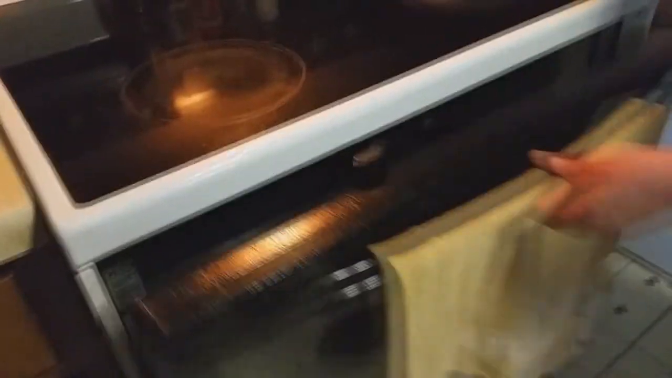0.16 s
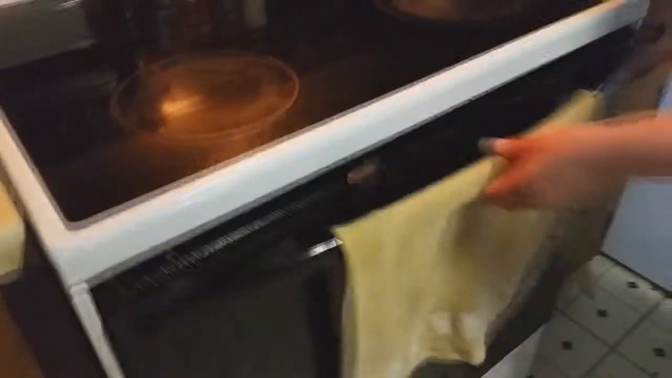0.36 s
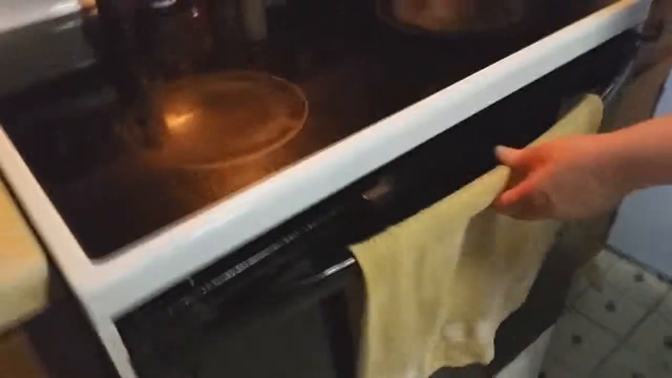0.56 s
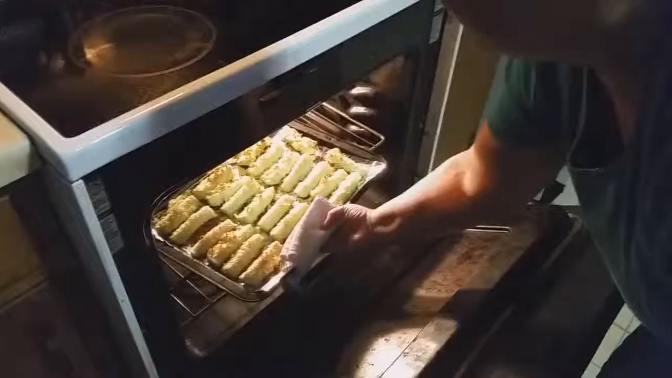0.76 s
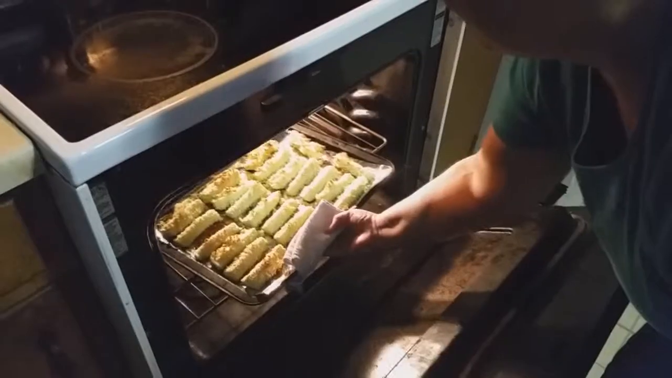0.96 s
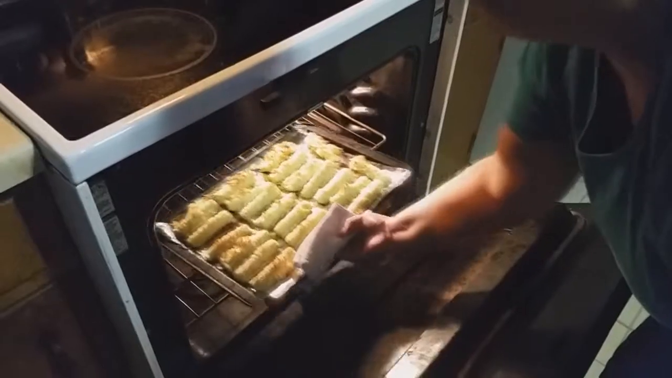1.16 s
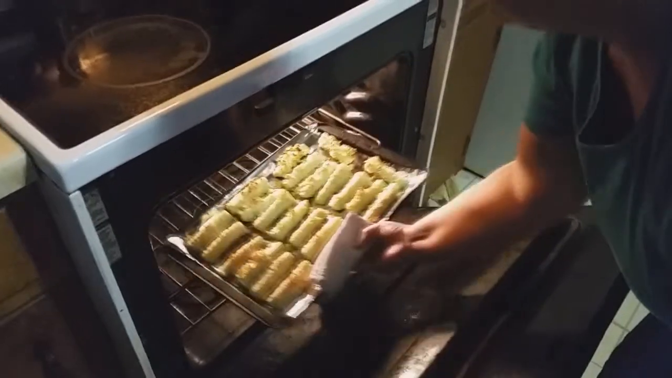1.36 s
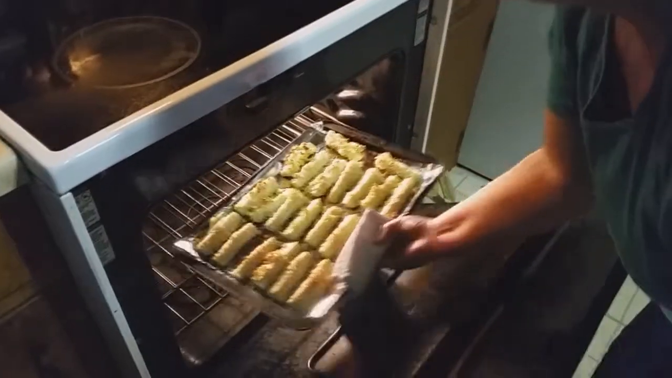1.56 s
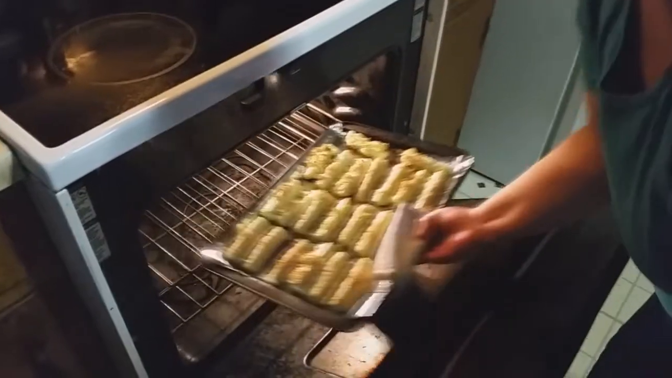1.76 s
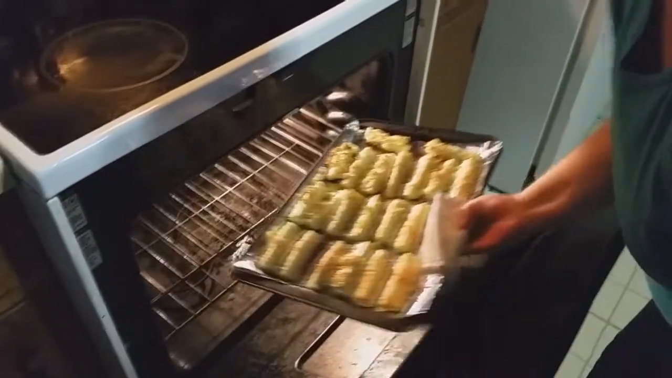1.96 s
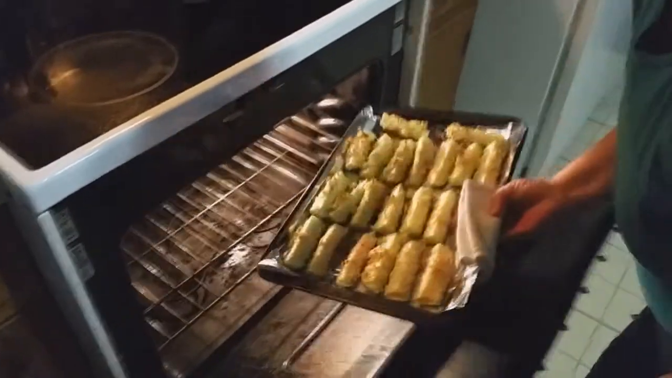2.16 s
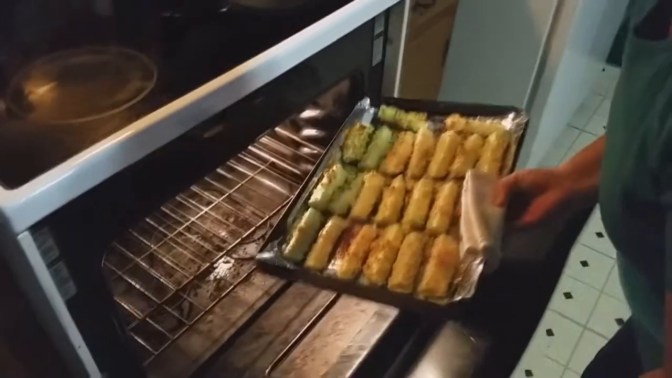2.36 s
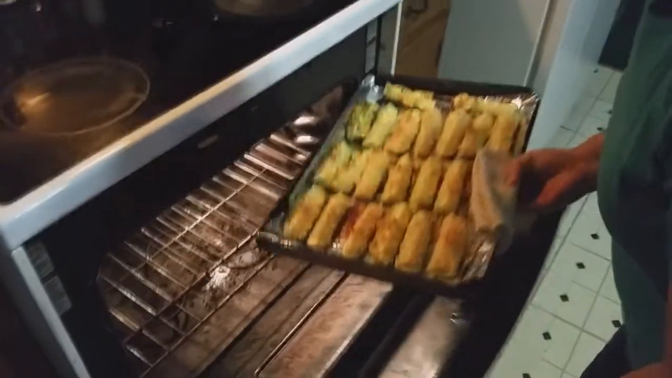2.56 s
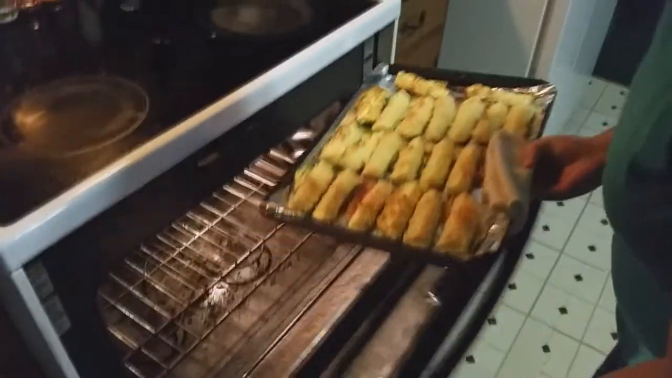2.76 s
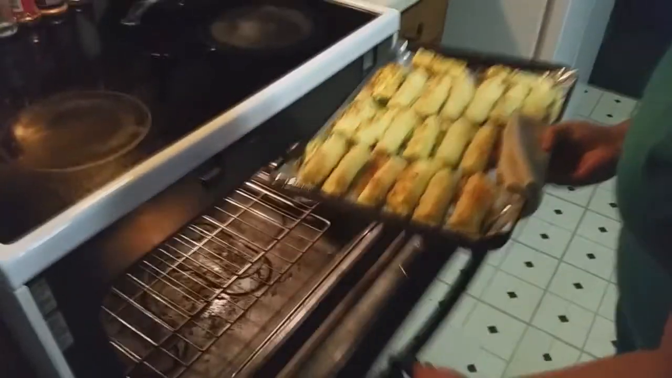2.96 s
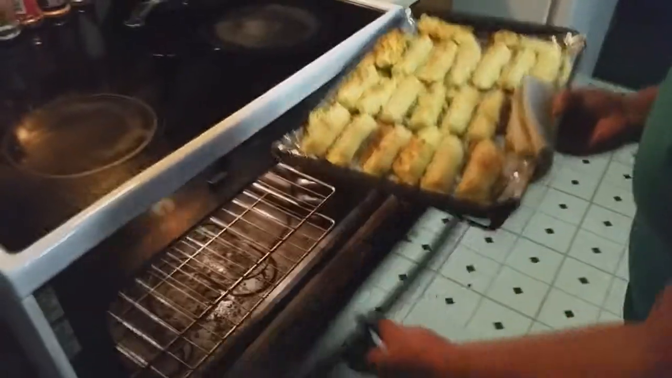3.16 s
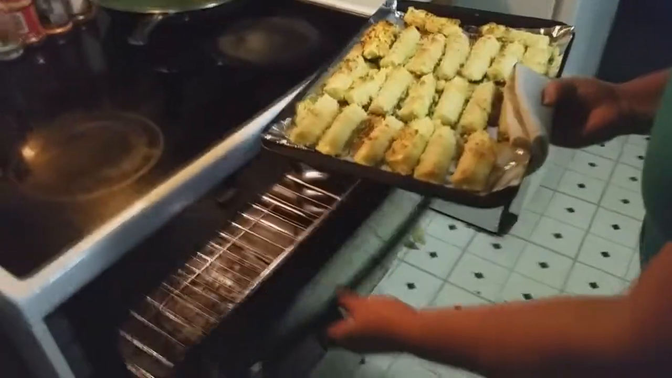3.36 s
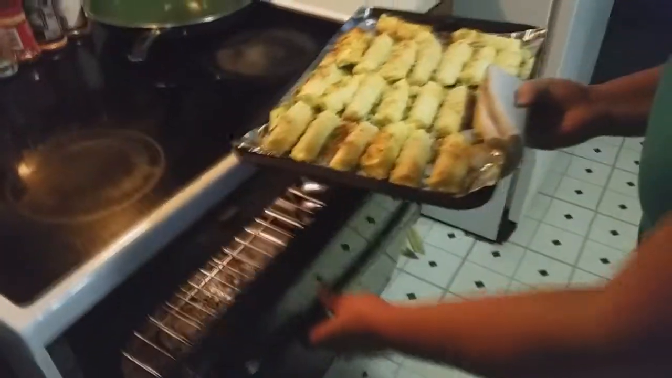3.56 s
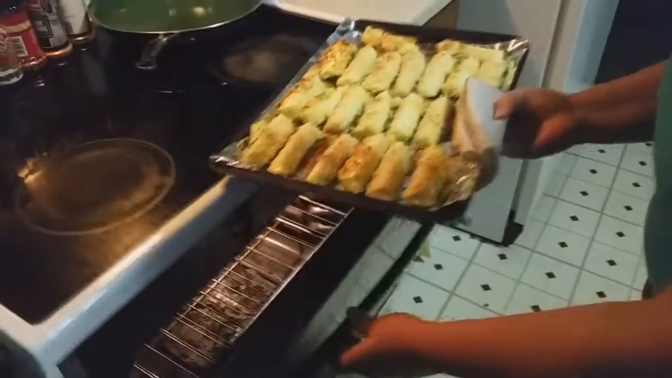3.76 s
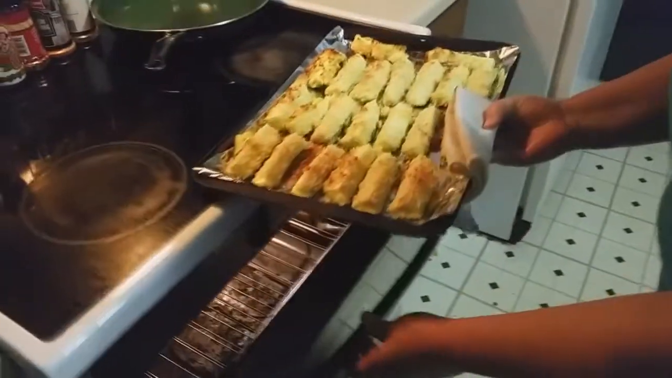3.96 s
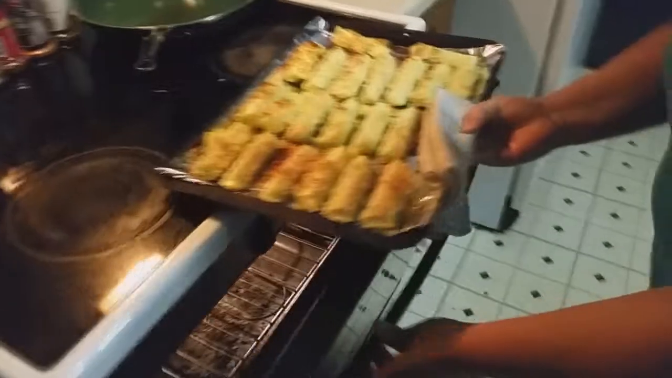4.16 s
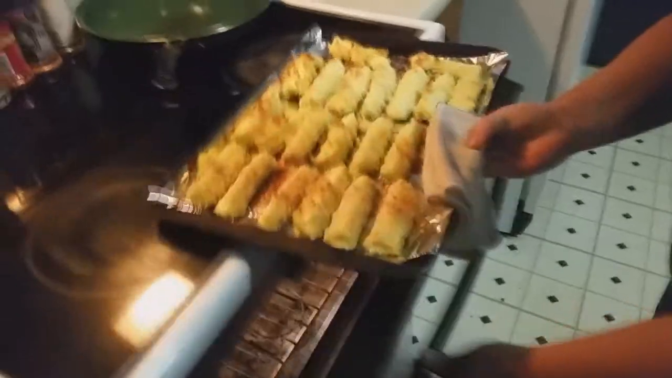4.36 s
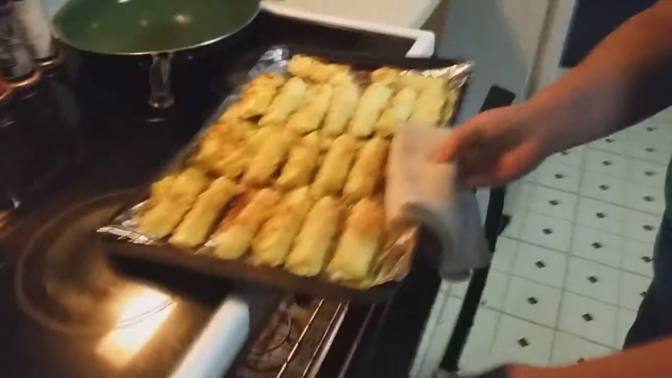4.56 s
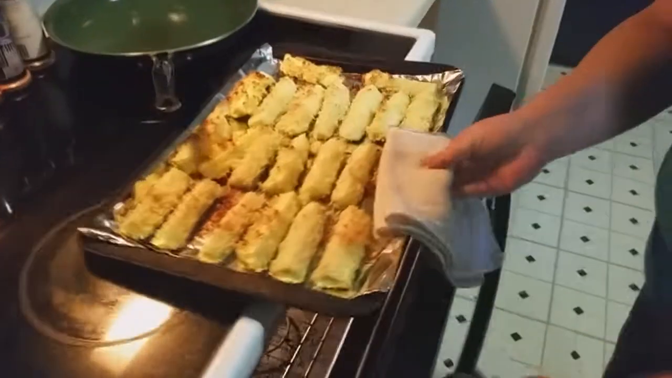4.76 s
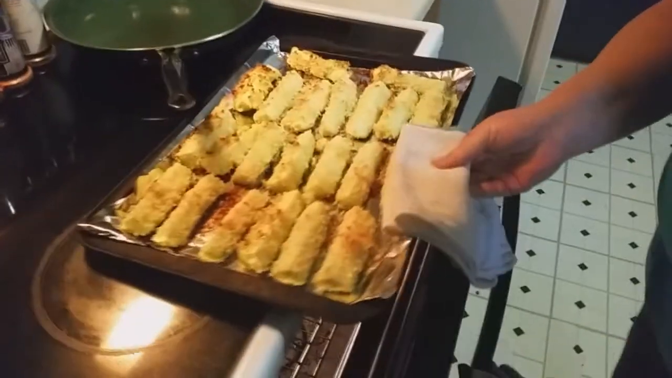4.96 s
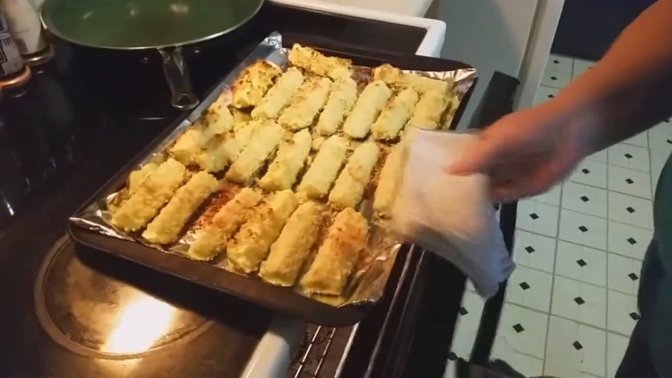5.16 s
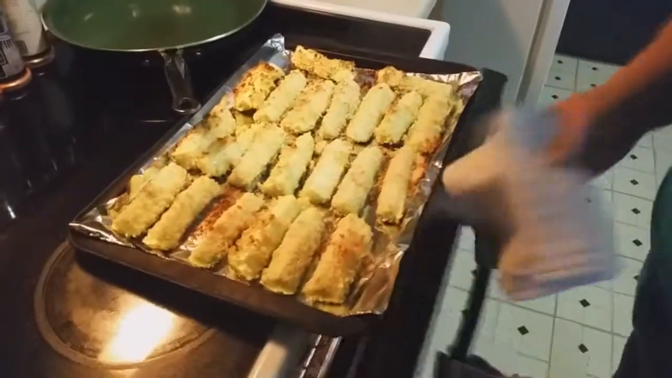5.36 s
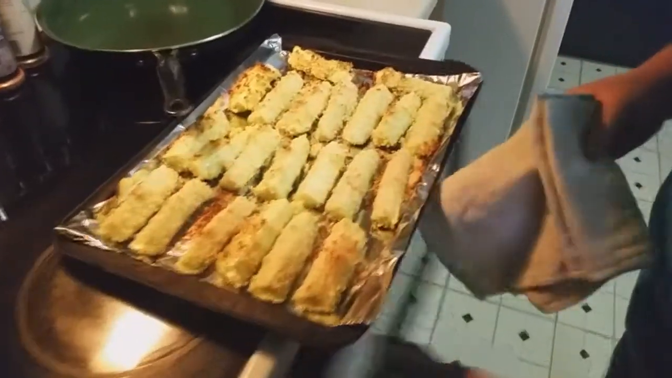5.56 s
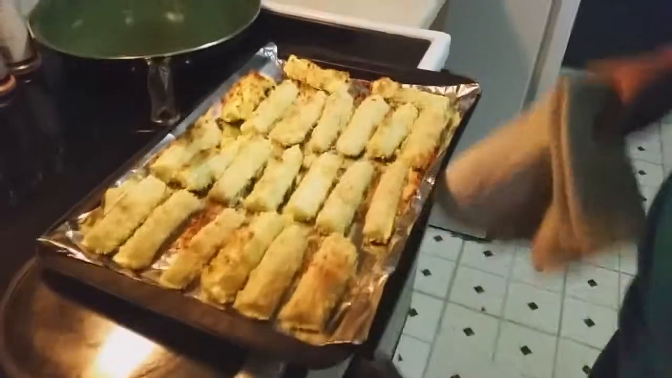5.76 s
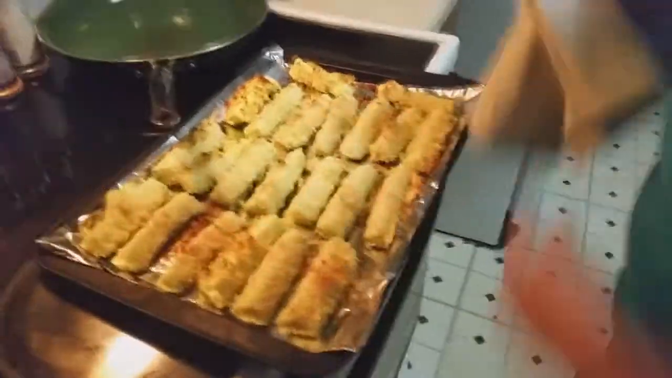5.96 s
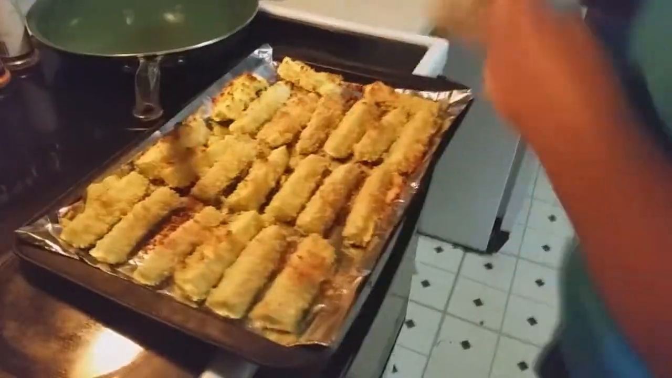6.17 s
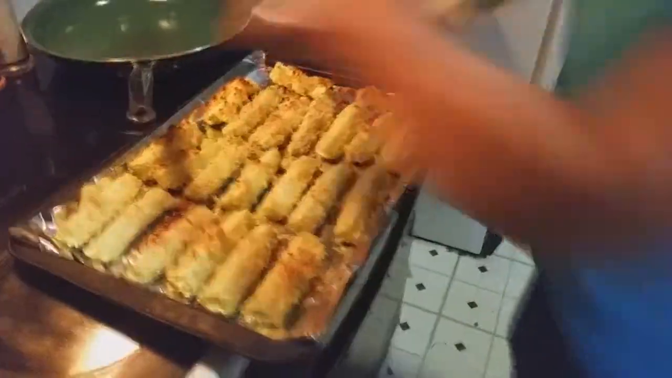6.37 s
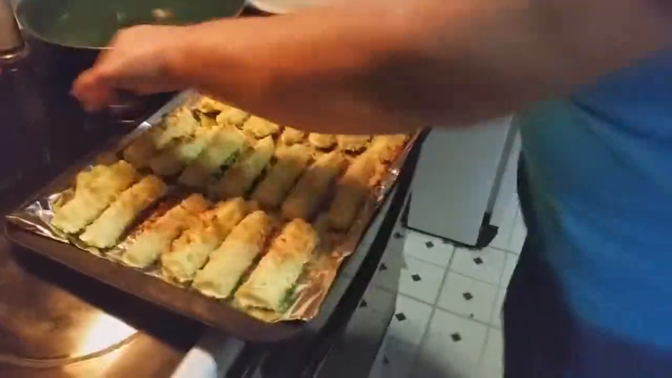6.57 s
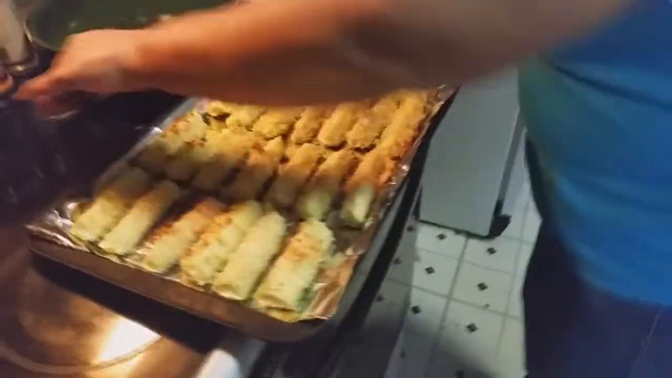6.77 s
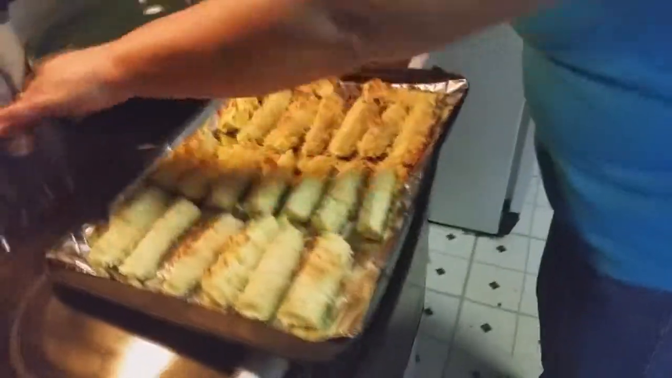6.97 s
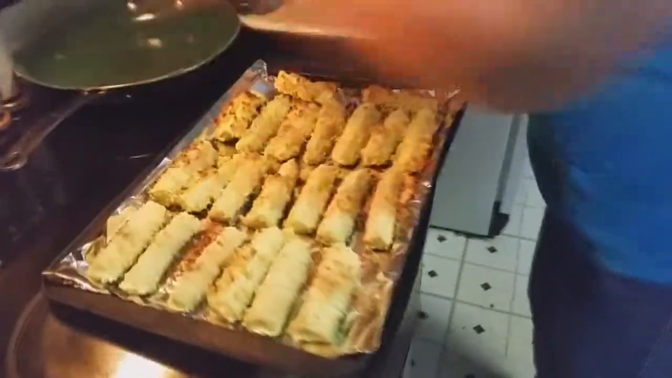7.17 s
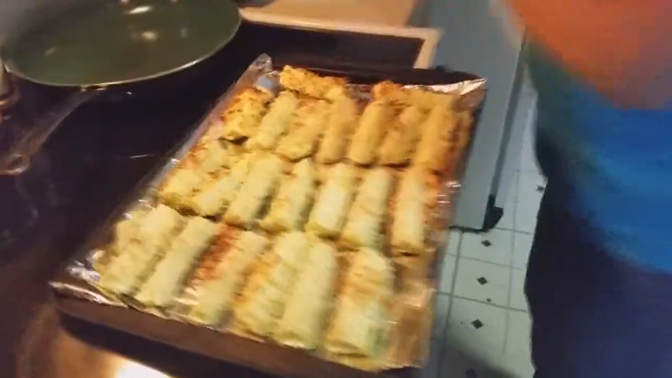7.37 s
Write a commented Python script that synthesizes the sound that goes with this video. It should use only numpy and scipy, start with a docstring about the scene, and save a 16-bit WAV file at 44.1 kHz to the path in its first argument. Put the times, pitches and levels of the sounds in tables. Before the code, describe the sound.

Close stereo pickup beside a stove, low hum throughout. First come knocks, a tiny squeak and the deep thump of an oven door, then light tray contacts and a short metallic scrape. A quieter gap with thin sizzling leads to sharp thin-steel clanks as the sheet drops on the stove top. Cloth swishes, metal squeaks, the door booms closed, and dull hand thumps and faint scraping finish.

```python
"""Baking sheet out of the oven

A kitchen with a humming fan, made of coloured noise and steady tones. An oven door thuds (air push,
seal, panel modes, cavity boom); a steel baking sheet scrapes off the rack and clanks down on the stove
top (chattering noise bursts and ringing modes), its food sizzling faintly in fine noise. The door
squeaks shut on gliding tones, a towel swishes as patchy noise, and a hand knocks about on the stove.
A small hard room answers the steel blows and the squeaks with a diffuse tail."""
import sys
import numpy as np
from scipy import signal
from scipy.fft import rfft, irfft, next_fast_len
from scipy.io import wavfile
from scipy.ndimage import uniform_filter1d, map_coordinates

SR = 44100
rng = np.random.default_rng(int(sys.argv[2]) if len(sys.argv) > 2 else 0)


def pcm_store(signal):
    """Save signal as 16-bit PCM."""
    levels = np.round(np.clip(np.atleast_2d(signal), -1, 1) * 32767)
    wavfile.write(sys.argv[1], SR, levels.astype(np.int16).T)


N = 327654
NOW = np.arange(N) / SR  # s since the scene began
AGE = np.arange(SR * 3 // 4) / SR  # s since a blow began

# In every spectrum table density_db is relative: dB per Hz before the noise is scaled to its level.


def amp(db):
    """Decibels to gain."""
    return 10 ** (np.asarray(db) / 20)


def unit(x):
    """Scaled to rms 1."""
    return x / np.sqrt(np.mean(x ** 2) + 1e-20)


def unit_attack(x):
    """Scaled to rms 1 over its first 20 ms."""
    return x / np.sqrt(np.mean(x[:, :SR // 50] ** 2) + 1e-20)


def fade(t60):
    """Exponential decay of one blow, 60 dB down after t60 seconds."""
    return 1000.0 ** (-AGE / np.maximum(t60, 1e-3))


def along(points, hz):
    """Interpolate (Hz, value) points on a log frequency axis."""
    point_hz, value = np.transpose(points)
    return np.interp(np.log(hz + 1), np.log(point_hz + 1), value)


def wobble(rate, size=N):
    """A smooth random curve with rate knots a second."""
    knots = rng.standard_normal(int(size * rate / SR) + 4)
    return map_coordinates(knots, [NOW[:size] * rate])


def strokes(rows, attack, release_t60):
    """Gain of (start_s, length_s, level_db) strokes: each rises, holds, then dies away; powers add."""
    power = np.zeros(N)
    for start, length, level_db in rows:
        rise = np.clip((NOW - start) / attack, 0, 1)
        fall_db = 60 * np.maximum(NOW - start - length, 0) / release_t60
        power += (rise * amp(level_db - fall_db)) ** 2
    return np.sqrt(power)


def filtered(x, response):
    """x times a response of frequency."""
    n = x.shape[-1]
    m = next_fast_len(n + 8192)
    return irfft(rfft(x, m) * response(np.fft.rfftfreq(m, 1 / SR)), m)[..., :n]


def coloured(x, spectrum):
    """x through a causal minimum-phase filter with the given (Hz, dB) shape."""
    n = x.shape[-1]
    m = 2 * next_fast_len(n // 2 + 4096)
    gain = np.maximum(amp(along(spectrum, np.fft.rfftfreq(m, 1 / SR))), 1e-5)
    # folding the cepstrum forward puts the filter's energy as early as it can be
    cepstrum = irfft(np.log(gain))
    cepstrum[1:m // 2] *= 2
    cepstrum[m // 2 + 1:] = 0
    return irfft(rfft(x, m) * np.exp(rfft(cepstrum)), m)[..., :n]


def band(x, edges, kind):
    """A causal band filter."""
    return signal.sosfilt(signal.butter(3, edges, kind, fs=SR, output="sos"), x)


# how alike the two ears of the stereo picture are: freq_hz, likeness [0-1]
STEREO_LIKENESS = [(60, 0.86), (200, 0.93), (350, 0.85), (700, 0.59), (1400, 0.053), (5000, 0.008)]


def diffuse(pair):
    """Two unrelated signals as spaced microphones hear them: bass alike, treble apart."""
    def mid_side(hz):
        turn = np.arccos(np.clip(along(STEREO_LIKENESS, hz), -1, 1)) / 2
        return np.array([np.cos(turn), np.sin(turn)])

    mid, side = filtered(pair, mid_side)
    return np.array([mid + side, mid - side])


def noise(spectrum, size=N):
    """Coloured stereo noise of rms 1."""
    return unit(coloured(diffuse(rng.standard_normal((2, size))), spectrum))


def patchy(x, depth_db):
    """x with a colour that shifts from moment to moment."""
    z = signal.stft(x, nperseg=512)[2]
    field = rng.standard_normal(z.shape[1:])
    field = uniform_filter1d(field, size=4, axis=0)  # smooth over frequency
    field = uniform_filter1d(field, size=12, axis=1)  # smooth over time
    return signal.istft(z * amp(depth_db * unit(field)))[1][:, :N]


def add(track, start, sound):
    """Mix a sound into the track at start seconds."""
    part = track[:, max(round(start * SR), 0):][:, :sound.shape[-1]]
    part += sound[:, :part.shape[-1]]


# decay of the small hard room: freq_hz, t60_s
ROOM_DECAY = [(150, 1), (600, 0.56), (2500, 0.65), (8000, 0.61), (14000, 0.52)]


def in_kitchen(x, wet_db, build=0.0026):
    """x with a fresh room tail; it builds up quickly and each frequency dies at its own speed."""
    hz, t, z = signal.stft(rng.standard_normal((2, SR // 2)), SR, nperseg=256)
    z = z * amp(-60 * t / along(ROOM_DECAY, hz)[:, None]) * (1 - np.exp(-t / build))
    tail = diffuse(signal.istft(z, SR)[1])
    tail *= amp(wet_db) / np.linalg.norm(tail[0])
    return x + signal.fftconvolve(x, tail, axes=1)[:, :x.shape[-1]]


def blow(modes, colour, levels_db, chatter, rise, snap, clatter_db, ring_db, ring_t60):
    """One contact: a snap, the uneven chatter of thin steel, and its modes at new strengths."""
    clatter = unit(amp(clatter_db * wobble(593, size=len(AGE))))
    burst = diffuse(rng.standard_normal((2, len(AGE)))) * clatter * fade(chatter) * (1 - fade(rise))
    burst[:, 0] -= snap

    hz, mode_db = np.transpose(modes)
    strength = amp(mode_db + 2 * rng.standard_normal((2, len(hz))))
    strength[1] *= rng.choice([-1, 1], len(hz))  # random polarity between the sides
    phase = rng.uniform(0, 2 * np.pi, (len(hz), 1))
    life = ring_t60 * (hz[:, None] / 1000) ** -.3  # high modes die sooner
    tones = np.sin(2 * np.pi * hz[:, None] * AGE + phase) * fade(life)
    ring = diffuse(strength @ tones)
    steel = unit_attack(coloured(burst, colour)) + amp(ring_db) * unit_attack(ring)

    # heavy contacts favour the low ranges, hard ones the high
    knock = band(steel, 800, "low")
    clang = band(steel, [800, 2400], "band")
    edge = band(steel, [2400, 4700], "band")
    crack = band(steel, 4700, "high")
    ranges = (knock, clang, edge, crack)
    return sum(amp(level) * unit_attack(part) for level, part in zip(levels_db, ranges))


# spectrum of the fan's air: freq_hz, density_db
FAN_AIR = [(12, -71), (20, -39), (53, -5), (86, -15), (113, -1), (130, -20.5), (146, -6.5), (202, 1.5),
           (313, -12), (335, -7.5), (367, -9), (412, -14), (442, -15), (597, -19.5), (5000, -48),
           (6500, -53), (11000, -120)]
# mains and fan lines: pitch_hz, level_db [rms]
HUM_LINES = [(59.2, -67.5), (118.4, -57), (204.6, -50), (236.9, -63), (306.8, -59), (441.4, -62.5)]


def fan():
    """Steady air noise under hum lines that waver slightly in level and phase."""
    hum = np.zeros(N)
    for hz, level_db in HUM_LINES:
        phase = 2 * np.pi * hz * NOW + 1.1 * wobble(2.497)
        hum += amp(level_db + 0.57 * wobble(2.9)) * np.sqrt(2) * np.sin(phase)
    return amp(-44) * noise(FAN_AIR) + hum


# the food's simmer, louder as it leaves the oven and comes nearer: time_s, level_db
SIMMER = [(0.0, -53.5), (0.45, -86), (0.95, -58.5), (1.8, -65.5), (3.2, -63), (4.0, -55), (5.1, -52.5),
          (6.4, -61), (6.95, -55), (7.43, -64)]
# spectrum of the sizzle: freq_hz, density_db
FIZZ_COLOUR = [(2060, -17), (3500, -1.5), (4360, -1), (4830, -6.5), (5730, -12), (6690, -6), (8100, -0.5),
               (8960, -5), (9790, 1.5), (11700, -1), (14500, -2.5)]
FLARE_DB, FLARE_T60 = -32, 0.66  # dB re the level of the jolt, s


def sizzle():
    """Fine fluttering noise of hot fat, which flares whenever the sheet is jolted."""
    jolts = [(start, 0, level_db + FLARE_DB) for start, level_db, *_ in SHEET_CONTACTS]
    flare = strokes(jolts, attack=0.023, release_t60=FLARE_T60)
    simmer = amp(np.interp(NOW, *np.transpose(SIMMER)))
    return np.hypot(simmer, flare) * unit(noise(FIZZ_COLOUR) * amp(0.81 * wobble(700)))


# the door rumbles on its hinges as it swings: start_s, length_s, level_db
DOOR_SWINGS = [(0.0, 1, -43.5), (3.58, 0.37, -52.5)]
# resonance of the oven cavity, also heard in the door's thud: freq_hz, density_db
CAVITY_BOOM = [(20, -26), (35, 1), (52, -19.5), (75, 5), (115, -2.5), (200, -3.5), (320, -8.5), (800, -48)]
STOVE_SHAKE_DB, SHEET_SHAKE_DB = -11.5, -17.5  # rumble re the sum of a blow's level_db and knock_db


def cabinet():
    """The swinging door and every knock shake the stove's cabinet; the light sheet shakes it less."""
    shakes = [(start, 0, level_db + knock_db + STOVE_SHAKE_DB)
              for start, level_db, knock_db, _ in STOVE_CONTACTS]
    shakes += [(start, 0, level_db + knock_db + SHEET_SHAKE_DB)
               for start, level_db, knock_db, _, _ in SHEET_CONTACTS]
    return strokes(DOOR_SWINGS + shakes, attack=0.0098, release_t60=0.49) * noise(CAVITY_BOOM)


# towel on foil and sheet: start_s, length_s, level_db [before the 3 dB lift in brush]
TOWEL_STROKES = [(0.8, 0.024, -57), (0.91, 0.041, -69), (5.1, 0.29, -53), (5.3, 0.05, -45.5),
                 (5.35, 0.036, -42), (5.44, 0.14, -55.5), (6.108, 0.04, -43.5), (6.6, 0.11, -61)]
# spectrum of cloth and foil: freq_hz, density_db
CLOTH_COLOUR = [(1760, -9), (3000, -13.5), (3450, -9.5), (4090, -6), (4760, -10.5), (5880, -8), (7650, -7),
                (11000, -4), (14500, -14)]


def brush(pull):
    """Cloth swells softly in noise of nearly even colour; a pull on the sheet also rustles its foil."""
    cloth = strokes(TOWEL_STROKES, attack=0.03, release_t60=0.26)
    rustle = cloth + amp(-3.5) * pull
    return amp(3.0) * rustle * unit(patchy(noise(CLOTH_COLOUR), depth_db=1.3) * amp(0.47 * wobble(170)))


# door, sheet and hand along the stove: start_s, length_s, level_db [before the 2 dB lift in rub]
STOVE_RUBS = [(0.0, 0.15, -51.5), (3.57, 0.21, -66), (5.11, 0.18, -50.5), (6.05, 1.21, -57),
              (6.87, 0.044, -48)]
# spectrum of metal friction, shared with the scrape: freq_hz, density_db
FRICTION_COLOUR = [(240, -33), (400, 3.5), (466, -12), (594, -7.5), (941, -11), (1040, -7), (1220, -11),
                   (1900, -11.5), (2520, -19.5), (3010, -16.5), (3630, -24), (4050, -22.5), (5500, -24.5),
                   (7150, -71), (12100, -120)]


def rub():
    """Surfaces slide along the stove as grainy noise whose colour shifts."""
    slide = strokes(STOVE_RUBS, attack=0.006, release_t60=1)
    return amp(2.0) * slide * unit(patchy(noise(FRICTION_COLOUR), depth_db=3.0) * amp(2 * wobble(200)))


# wires of the rack: freq_hz, width_hz, level_db [resonance gain, relative]
RACK_WIRES = [(1875, 83, -1), (2190, 140, 3), (2960, 83, -4), (4250, 800, 4)]


def scrape(pull):
    """Sliding metal catches in tiny slips that ring the rack's wires as resonant filters."""
    def wires(f):
        return sum(amp(level_db) * 1j * f * width / (hz * hz - f * f + 1j * f * width)
                   for hz, width, level_db in RACK_WIRES)

    slips = noise(FRICTION_COLOUR) * amp(-0.8 * wobble(500))
    rack = unit(slips) + amp(-5) * unit(filtered(slips, wires))
    return amp(3.0) * pull * unit(patchy(rack, depth_db=2.5))  # the contact point wanders


# the sheet is pulled over the rack: start_s, length_s, level_db [before the 3 dB lift in scrape]
SHEET_PULLS = [(1.13, 0.16, -49.5), (1.315, 0.1, -47)]


def friction():
    """The pull drives both scrape and foil: it catches at once and the rack rings out."""
    pull = strokes(SHEET_PULLS, attack=0.016, release_t60=0.6)
    return brush(pull) + rub() + scrape(pull)


# rubbing metal: start_s, length_s, level_db [fundamental's peak], pitch_hz [at the start],
# glide_hz_per_s, octave_db [re fundamental], roughness [0-1]
METAL_SQUEAKS = [(0.257, 0.03, -44, 1685, 1815, -12, 0.2), (4.824, 0.03, -63, 1580, -850, 15, 0.35),
                 (5.116, 0.16, -58.5, 1535, 0, 6.5, 0.8), (5.502, 0.14, -51.5, 1605, -2300, -4, 0.75),
                 (6.62, 0.76, -59, 1970, -340, -7.5, 0.85)]


def squeaks(jitter=0.06):
    """Hinge and metal slip at a pitch: each squeak swells, glides and fades; roughness smears it."""
    out = np.zeros(N)
    for start, length, level_db, pitch, glide, octave_db, rough in METAL_SQUEAKS:
        age = np.clip(NOW - start, 0, length)
        hz = (pitch + glide * age) * (1 + jitter * rough * wobble(900))
        phase = 2 * np.pi * np.cumsum(hz) / SR
        tone = np.sin(phase) + amp(octave_db) * np.sin(2 * phase)
        tone *= amp(5 * rough * wobble(120))
        out += amp(level_db) * np.sin(np.pi * age / length) * tone
    return in_kitchen(np.array([out, out]), wet_db=-5)


# the hand comes down softly on the stove top: start_s, level_db
HAND_THUMPS = [(6.879, -34), (7.018, -33), (7.163, -42)]
# deepest modes of the stove top: pitch_hz, level_db [re the thump], t60_s
COOKTOP_MODES = [(124.4, 0.5, 0.33), (169.5, 0, 0.37), (212.6, 3, 0.34)]


def thumps(rise=0.033):
    """A soft hand rings only the deepest modes of the stove top."""
    out = np.zeros((2, N))
    for start, level_db in HAND_THUMPS:
        ring = sum(amp(level_db + mode_db) * np.sin(2 * np.pi * hz * AGE) * fade(t60)
                   for hz, mode_db, t60 in COOKTOP_MODES)
        add(out, start, np.array([ring, ring]) * (1 - fade(rise)))
    return out


# knocks on door and stove: start_s, level_db [reference], knock_db [low range re level],
# crack_db [high range re level]; stove() trims each range
STOVE_CONTACTS = [(0.146, -27.5, -3.5, -21), (0.191, -31.5, 3, -19), (0.519, -19, -1, -28),
                  (0.577, -24.5, 3, -12.5), (3.58, -34.5, -1.5, -21), (3.783, -36.5, 3, -48),
                  (5.676, -36.5, -3, -31), (5.821, -21, -1, -27.5), (5.867, -26, -3.5, -13.5),
                  (5.996, -52, 3, 2), (6.641, -31.5, -3.5, -21.5), (6.692, -35.5, -1, -16),
                  (6.876, -29, 2.5, -12), (6.926, -29.5, -10, -13), (6.942, -29, 1, -11),
                  (7.017, -41.5, 13, -9), (7.162, -48, 11, -20)]
# modes of the stove's panels: pitch_hz, level_db [relative]
STOVE_MODES = [(290.7, -43.5), (473.7, -44.5), (522.2, -52), (570.6, -48), (592.2, -81), (732.1, -47),
               (796.7, -61), (1066, -53), (1297, -57), (1873, -50), (2180, -81), (2756, -60)]
# dense ringing between those modes: freq_hz, density_db
STOVE_RINGING = [(59, -27), (100, -2.5), (216, -9), (342, -12.5), (540, -15), (754, -16), (1100, -12),
                 (1220, -14), (1810, -23), (3110, -33.5), (3910, -28), (4810, -39), (10600, -37),
                 (14500, -47.5)]
STOVE_EDGE_DB, STOVE_EDGE_FOLLOWS = -11, 0.41  # edge re level at 0 dB crack, dB per dB of crack
# t60 in s at 0 dB crack; every so many dB less crack doubles it
STOVE_CHATTER_S, CHATTER_DOUBLING_DB = 0.092, 36


def stove():
    """Hinge stops, door and hand knock on steel panels; harder contacts are brighter and shorter."""
    out = np.zeros((2, N))
    for start, level_db, knock_db, crack_db in STOVE_CONTACTS:
        edge_db = STOVE_EDGE_DB + STOVE_EDGE_FOLLOWS * crack_db
        chatter = STOVE_CHATTER_S * 2 ** (-crack_db / CHATTER_DOUBLING_DB)
        levels_db = level_db + np.array([knock_db - 9.0, -12, edge_db, crack_db - 5.5])
        hit = blow(STOVE_MODES, STOVE_RINGING, levels_db, chatter,
                   rise=0.0082, snap=5.2, clatter_db=2, ring_db=-12, ring_t60=0.2)
        add(out, start, in_kitchen(hit, wet_db=-5))
    return out


# the door meets its seal: start_s, level_db [reference for all its parts], clonk_db [panel re level]
DOOR_THUDS = [(0.506, -18, 3), (5.803, -17.5, -3)]
# the door's outer panel: pitch_hz, level_db [re the clonk], t60_s
PANEL_MODES = [(506, 0, 0.068), (567, -3.5, 0.093), (1274, 2, 0.022)]


def door(push_hz=72, push_s=0.007, seal_rise=0.0066, boom_rise=0.0051, clonk_delay=0.014):
    """One swing of air and a crushed seal; then the panel clonks and the oven cavity booms."""
    out = np.zeros((2, N))
    for start, level_db, clonk_db in DOOR_THUDS:
        push = np.sin(2 * np.pi * push_hz * AGE) * np.exp(-((AGE - push_s) / push_s) ** 2)
        seal = noise(STOVE_RINGING, size=len(AGE)) * AGE / seal_rise * np.exp(1 - AGE / seal_rise)
        boom = noise(CAVITY_BOOM, size=len(AGE)) * fade(0.32) * (1 - np.exp(-AGE / boom_rise))
        sway = np.sin(2 * np.pi * 52 * AGE) * fade(0.98)  # the whole door swings on its hinges
        thud = amp(2) * push + amp(-19) * seal + amp(-14) * sway + amp(-12) * boom
        add(out, start, amp(level_db) * thud)

        clonk = sum(amp(mode_db) * np.sin(2 * np.pi * hz * AGE) * fade(t60)
                    for hz, mode_db, t60 in PANEL_MODES)
        clonk = amp(level_db + clonk_db) * clonk * (1 - fade(0.04))
        add(out, start + clonk_delay, in_kitchen(np.array([clonk, clonk]), wet_db=-7.5))
    return out


# contacts of the sheet: start_s, level_db [reference], knock_db [low range re level],
# crack_db [high range re level], chatter_t60_s; tray() trims each range
SHEET_CONTACTS = [(0.878, -39.5, -5, -19, 0.042), (1.023, -36.5, -17.5, -12, 0.23),
                  (1.136, -36, -3, -17, 0.12), (4.0197, -14, -7, -18, 0.22), (4.113, -24.5, -5, -18, 0.26),
                  (4.21, -24.5, -5.5, -19, 0.19), (4.276, -27.5, -17, -9, 0.43),
                  (4.462, -29.5, -14, -16, 0.55), (4.482, -31, -2, -10.5, 0.85),
                  (4.509, -24, -4.5, -15, 0.11), (4.602, -6.5, -14.5, -20, 0.096),
                  (4.611, -11, -15.5, -15.5, 0.41), (4.624, -12.5, -9.5, -18, 0.14),
                  (4.662, -11.5, -24, -19, 0.074), (4.668, -15.5, -13, -24, 0.042),
                  (4.703, -6.5, -16, -21, 0.075), (4.708, -14.5, -14, -19, 0.21),
                  (5.009, -34, -11, -33, 0.2), (5.098, -26, -0.5, -35, 0.24)]
# modes of the sheet: pitch_hz, level_db [relative]
SHEET_MODES = [(296.1, -41), (349.9, -38.5), (527.6, -45), (678.3, -43), (818.3, -42), (1001, -48),
               (1260, -48), (1340, -46), (1421, -48.5), (1459, -49), (1572, -78), (1750, -48), (1884, -46),
               (2040, -46), (2164, -49), (2239, -77), (2439, -48), (2950, -35), (3047, -47), (3079, -36.5),
               (3171, -39), (3515, -38), (3666, -44.5), (3903, -40), (4140, -46), (4317, -62)]
# dense ringing between those modes: freq_hz, density_db
SHEET_RINGING = [(88, -47), (150, 4), (247, -1.5), (287, 2), (421, -2.5), (667, 0), (734, -10.5),
                 (1020, -5.5), (1410, -8), (2220, -9), (2590, -12), (3020, -2.5), (5900, -13.5),
                 (11300, -4.5), (14500, -15)]
# bright edge re level at 0 dB, dB lost per dB of softer blow, dB per dB of crack
EDGE_DB, EDGE_FORCE, EDGE_FOLLOWS = -6, 0.26, 0.39


def tray():
    """The sheet touches the rack, bumps the stove's edge, then lands and bounces; hard hits ring higher."""
    out = np.zeros((2, N))
    for start, level_db, knock_db, crack_db, chatter in SHEET_CONTACTS:
        edge_db = EDGE_DB + EDGE_FORCE * level_db + EDGE_FOLLOWS * crack_db
        levels_db = level_db + np.array([knock_db - 7.0, -13, edge_db, crack_db - 2.5])
        hit = blow(SHEET_MODES, SHEET_RINGING, levels_db, chatter,
                   rise=0.0043, snap=5.5, clatter_db=1.5, ring_db=-7.5, ring_t60=0.2)
        add(out, start, in_kitchen(hit, wet_db=-14.0))
    return out


def scene():
    """All the layers together, leaning a little to the right."""
    backdrop = fan() + sizzle() + cabinet()
    handling = friction() + squeaks() + thumps()
    blows = stove() + door() + tray()
    return (backdrop + handling + blows) * amp([[-.3], [.3]])


def record(dry):
    """A very steep low-pass at 14650 Hz limits the band."""
    return filtered(dry, lambda hz: 1 / (1 + (hz / 14650) ** 200))


dry = scene()
out = record(dry)
pcm_store(out)
```